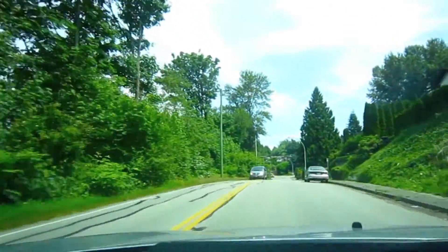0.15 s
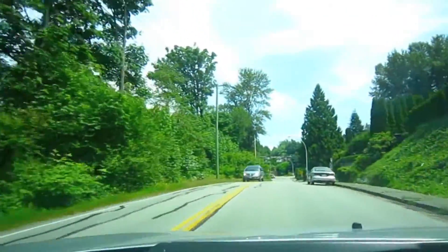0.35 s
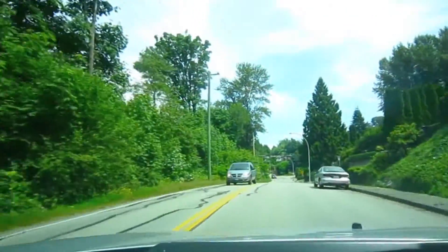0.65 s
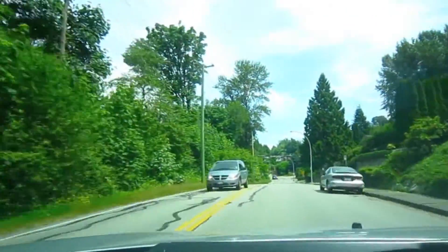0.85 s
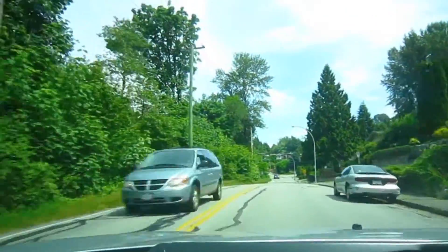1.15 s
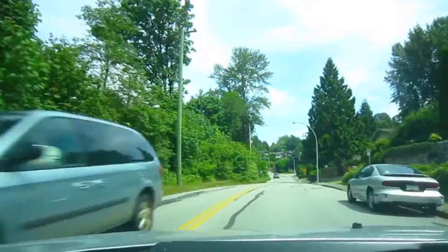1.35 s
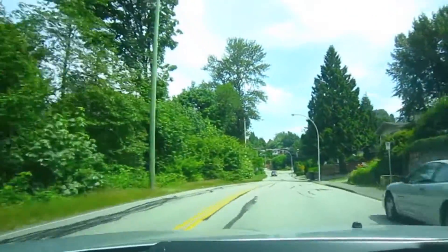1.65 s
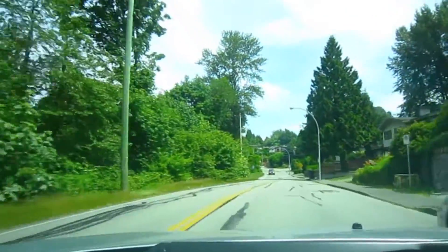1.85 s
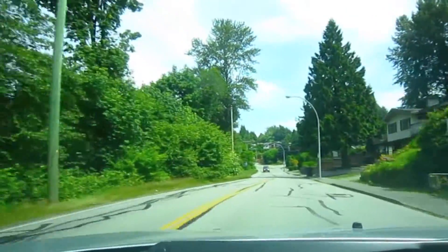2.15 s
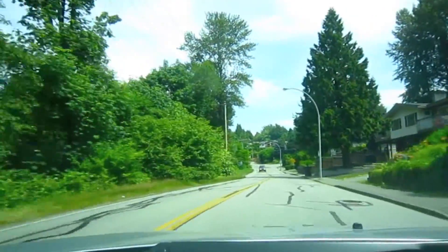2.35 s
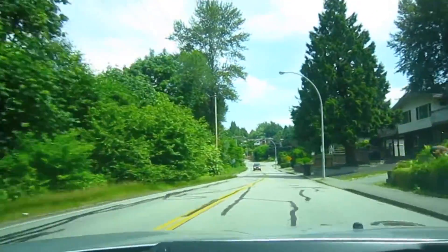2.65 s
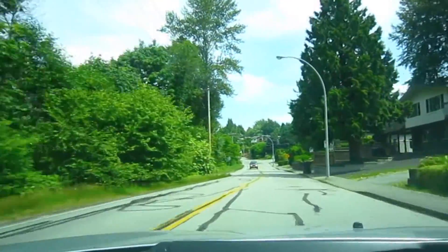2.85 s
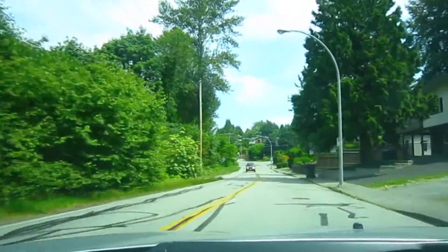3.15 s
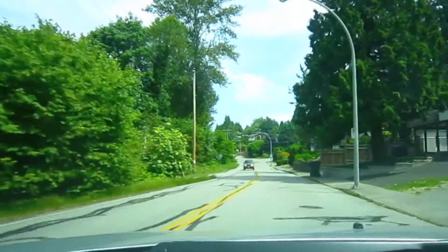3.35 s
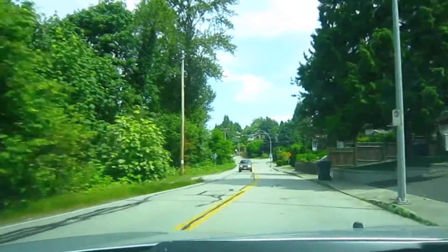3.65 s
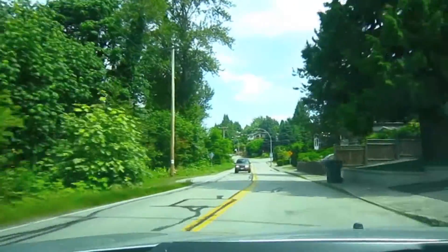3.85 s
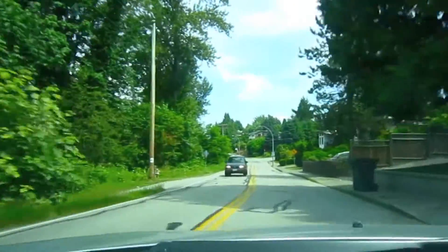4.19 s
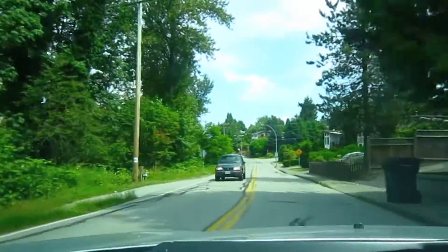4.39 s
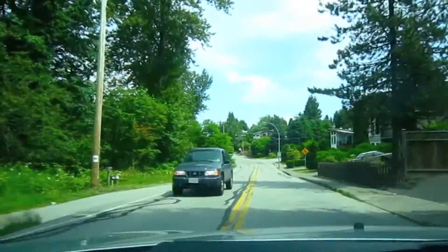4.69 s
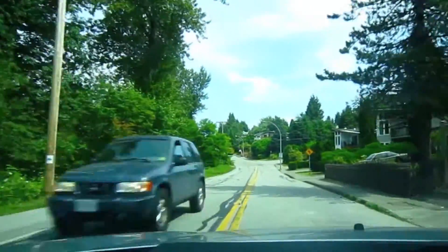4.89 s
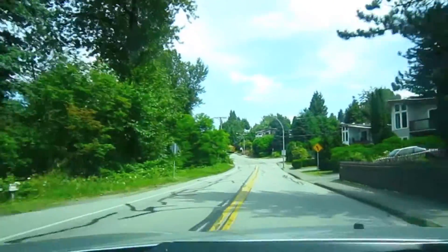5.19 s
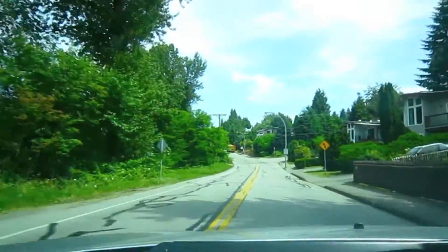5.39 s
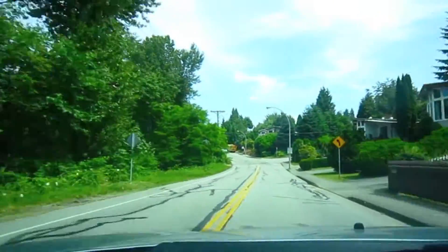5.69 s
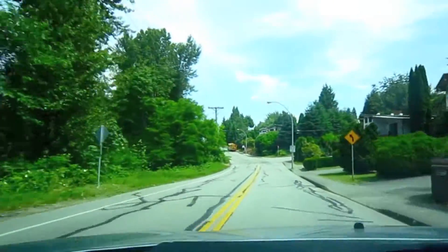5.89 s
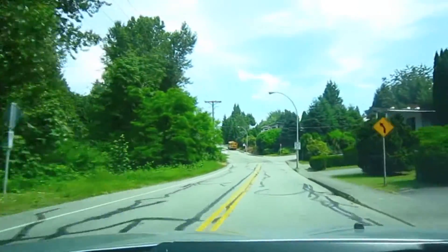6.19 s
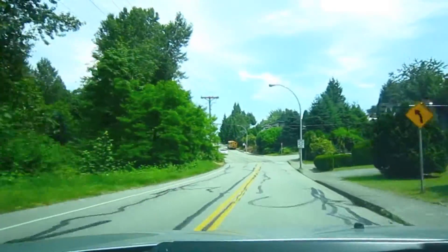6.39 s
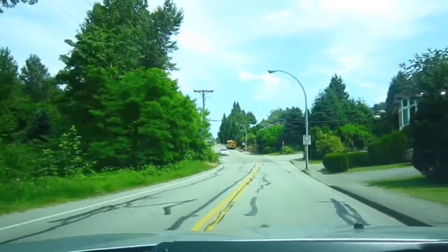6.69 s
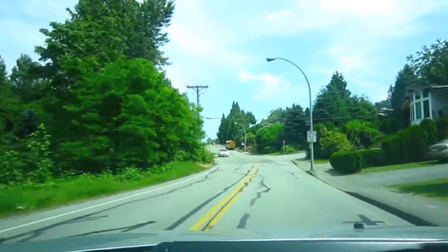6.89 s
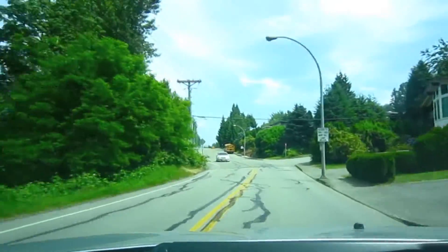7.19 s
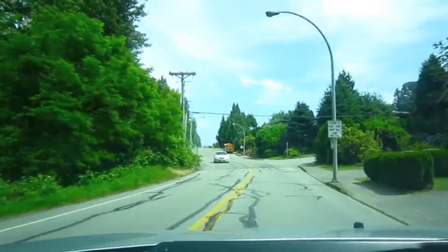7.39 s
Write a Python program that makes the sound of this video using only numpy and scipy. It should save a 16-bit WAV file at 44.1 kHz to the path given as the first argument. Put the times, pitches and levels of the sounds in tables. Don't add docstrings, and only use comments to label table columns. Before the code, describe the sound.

Heard from a small microphone inside a car: deep boom, floor drone, muffled tyre roar, soft air hiss and a faint gear whine. An oncoming car swishes by early. A dry dashboard tick follows, then a hard bump thumps the floor and rattles trim, coins and keys. The background dips briefly, recovers, and a fainter car passes.

```python
import sys
import numpy as np
from scipy import signal
from scipy.fft import rfft, irfft, next_fast_len
from scipy.io import wavfile
from scipy.ndimage import uniform_filter1d, map_coordinates

SR = 44100
rng = np.random.default_rng(int(sys.argv[2]) if len(sys.argv) > 2 else 0)


def transcribe(signal):
    frames = np.atleast_2d(signal).T
    limited = np.clip(frames, -1, 1)
    pcm = np.round(limited * 32767).astype(np.int16)
    wavfile.write(sys.argv[1], SR, pcm)


def how_loud(loudness_db):
    steps = np.asarray(loudness_db, float) / 20
    return 10 ** steps


N = 332514


def unit(x):
    return x / np.sqrt(np.mean(x ** 2) + 1e-20)


def curves(rows):
    times, *columns = np.transpose(rows)
    return [np.interp(np.arange(N) / SR, times, column) for column in columns]


def wobble(rate):
    knots = rng.standard_normal(int(N * rate / SR) + 4)
    return map_coordinates(knots, [np.arange(N) * rate / SR])


def noise(spectrum, modes=(), patchy_db=0.):
    z = signal.stft(rng.standard_normal(N + 512), nperseg=512)[2]
    patches = uniform_filter1d(rng.standard_normal(z.shape), 8, 0)
    patches = unit(uniform_filter1d(patches, 8, 1))
    x = signal.istft(z * how_loud(patchy_db * patches), nperseg=512)[1][:N]
    m = next_fast_len(N)
    hz = np.fft.rfftfreq(m, 1 / SR) + 1
    f, level = np.transpose(spectrum)
    db = np.interp(np.log(hz), np.log(f), level, left=-120)
    for centre, width, lift in modes:
        db += lift / (1 + (2 * (hz - centre) / width) ** 2)
    return unit(irfft(rfft(x, m) * how_loud(db), m)[:N])


def ring(modes, t, scatter_db, attack):
    total = np.zeros(len(t))
    for hz, db, t60 in modes:
        strength_db = db + rng.normal(0, scatter_db)
        total += how_loud(strength_db - 60 * t / t60) * np.sin(2 * np.pi * hz * t)
    return (1 - np.exp(-t / attack)) * total


def place(out, s, sound):
    out[round(s * SR):][:len(sound)] += sound


def crack(t):
    spike = np.exp(-((t - .0012) * SR) ** 2)
    puff = .07 * how_loud(-60 * t / .012) * rng.standard_normal(len(t))
    return spike + puff


# t/s, depth/dB, hold/s, recovery/s
GAIN_DUCKS = [
    (-.1, 3.5, 0.02, 0.53),
    (4.02, 7, 0.3, .3),
]


def gain_db():
    t = np.arange(N) / SR
    fall_s = .03
    total = np.zeros(N)
    for s, depth_db, hold, recovery in GAIN_DUCKS:
        drop = ((t - s) / fall_s).clip(0, 1)
        total -= depth_db * drop * np.exp(-(t - s - hold).clip(0) / recovery)
    return total


# t/s, unevenness/dB, coarseness/dB
ROAD_SURFACE = [(0, -1.5, -3), (.5, 0, -0.5), (1.1, 1, -0.5), (1.4, -0.5, 0.8), (2.0, 2, 0.6),
                (2.4, 1, -0.5), (2.9, 0, -1.5), (3.3, 1, -2), (3.6, 0, -1), (4.05, 0.5, -2), (4.2, 5, 0.5),
                (4.5, 0, -.5), (5.2, -1, 1), (5.6, 0, -0.4), (6.1, -0.5, 0.4), (6.5, 0.5, 0.4),
                (6.9, 2, -0.9), (7.54, -2.5, 0.5)]
# f/Hz, level/dB
BOOM_SPECTRUM = [(20, 0), (30, -2.5), (60, 2.5), (110, 0), (140, -4), (170, -27.5), (260, -68.5)]
# f/Hz, width/Hz, lift/dB
BODY_MODES = [(36.5, 16, 5), (100.4, 19.6, 7.5)]
# f/Hz, level/dB
DRONE_SPECTRUM = [(90, -39.5), (130, -17), (150, 1.5), (205, -5), (290, -3.5), (400, -11.5), (470, -18),
                  (510, -19.5), (540, -39), (700, -71)]
# f/Hz, width/Hz, lift/dB
FLOOR_MODES = [(159.8, 7.2, 5), (216.6, 2.9, 5.5), (232.5, 7.1, 5.5), (282.4, 24, 2), (430.3, 31, 3.5)]
# f/Hz, level/dB
ROAR_SPECTRUM = [(350, -29), (520, -4), (700, -3.5), (950, 0.5), (1160, -13.5), (1450, -10), (1580, -16),
                 (2000, -22), (2600, -28.5), (4000, -51)]
# f/Hz, width/Hz, lift/dB
TYRE_MODES = [(605, 30, 4.5), (915, 35, 0.5), (1108, 28, 3), (1283, 80, 3.5), (1684, 55, 6.5)]
# f/Hz, level/dB
HISS_SPECTRUM = [(1200, -22), (2200, -1), (3000, -1), (4000, -4), (5500, -7.5), (6100, -7), (7000, -10),
                 (10000, -15), (13000, -27), (15000, -28), (15800, -29.5)]


def road():
    boom_db, drone_db, roar_db, hiss_db = -22, -24, -39.5, -62.5
    warming_db_per_s = 0.07
    uneven_db, coarse_db = curves(ROAD_SURFACE)
    floor_db = .15 * uneven_db + .4 * coarse_db + warming_db_per_s * (np.arange(N) - N / 2) / SR
    boom = how_loud(boom_db + uneven_db + .8 * wobble(4)) * noise(BOOM_SPECTRUM, BODY_MODES)
    drone = how_loud(drone_db + floor_db + 0.52 * wobble(5)) * noise(DRONE_SPECTRUM, FLOOR_MODES, patchy_db=-0.73)
    roar = how_loud(roar_db + coarse_db + 0.26 * wobble(6)) * noise(ROAR_SPECTRUM, TYRE_MODES, patchy_db=0.48)
    hiss = how_loud(hiss_db + 0.76 * coarse_db + .3 * wobble(12)) * noise(HISS_SPECTRUM, patchy_db=0.05)
    return boom + drone + roar + hiss


# t/s, f/Hz
WHINE_PITCH = [(0, 489), (2, 489), (2.7, 492.5), (3.1, 497), (3.7, 503), (4.6, 509), (5.8, 517), (6.5, 514),
               (7.54, 510)]
# t/s, level/dB
WHINE_LEVEL = [(0, -38), (1.5, -41), (2.1, -42.5), (2.8, -42), (3.8, -41), (4.6, -50.5), (5.8, -48),
               (6.4, -53), (7.54, -44)]
# share of the whine's f, level/dB
ENGINE_ORDERS = [(0.124, -28.5), (0.178, -29.5), (0.252, -33.5)]


def drivetrain():
    load_db = curves(ROAD_SURFACE)[0]
    turns = 2 * np.pi * np.cumsum(curves(WHINE_PITCH)[0]) / SR
    whine_db = curves(WHINE_LEVEL)[0] + 2.4 * wobble(4)
    total = how_loud(whine_db) * np.sin(turns + 0.54 * wobble(6.5))
    for share, db in ENGINE_ORDERS:
        hum_db = db + load_db + 3.6 * wobble(2.55)
        total += how_loud(hum_db) * np.sin(share * turns + 0.27 * wobble(3.13))
    return total


def camera_whistle():
    return how_loud(-95.5) * np.sin(2 * np.pi * 15688 * np.arange(N) / SR)


# closest t/s, level/dB, passing time/s
ONCOMING_CARS = [
    (1.5, -56.5, 0.34),
    (5.1, -66.5, .25),
]
# f/Hz, level/dB
ONCOMING_TYRES = [(900, -14.5), (1500, -7), (1800, 3.5), (2300, -8.5), (4000, -14.5), (8000, -27)]


def oncoming():
    t = np.arange(N) / SR
    swell = sum(how_loud(db) / np.sqrt(1 + ((t - s) / passing) ** 4) for s, db, passing in ONCOMING_CARS)
    return swell * noise(ONCOMING_TYRES, patchy_db=0.5)


# t/s, peak level/dB
DASHBOARD_TICKS = [
    (2.9209, -46.5),
    (4.972, -60),
]


def dashboard_ticks():
    t = np.arange(N) / SR
    decay = sum(how_loud(db - 2 - 60 * (t - s).clip(0) / .018) * (t >= s) for s, db in DASHBOARD_TICKS)
    return decay * noise([(4500, -32), (7000, -1), (15500, 0.0)])


# t/s, level/dB
TRAY_KNOCKS = [(3.891, -32), (4.005, -33), (4.0154, -27), (4.0305, -27), (4.0418, -25), (4.052, -29),
               (4.0664, -24.5), (4.1347, -32.5), (4.15, -41), (4.2005, -26), (4.2045, -26.5), (4.2714, -31),
               (4.2941, -38)]
# f/Hz, level/dB, T60/s
TRAY_MODES = [(953, 1, 0.031), (1220, -1.5, 0.024), (1420, -3, 0.027), (1760, -6, 0.024),
              (2340, -10, 0.027), (2650, -9.5, 0.017)]


def tray_knocks():
    out, t = np.zeros(N), np.arange(SR // 10) / SR
    for s, db in TRAY_KNOCKS:
        place(out, s, how_loud(db - 6) * ring(TRAY_MODES, t, scatter_db=1.5, attack=0.00061))
    return out


# t/s, level/dB
TRIM_SCUFFS = [(3.891, -52), (3.9705, -47), (3.9952, -53), (4.0018, -44), (4.006, -44), (4.0154, -34.5),
               (4.031, -44), (4.0418, -44), (4.056, -44), (4.0664, -42), (4.075, -47), (4.15, -52),
               (4.179, -46), (4.2015, -45), (4.2714, -51)]
# t/s, level/dB
TRIM_SNAPS = [(4.005, -44), (4.0515, -31), (4.062, -42), (4.0943, -32.5), (4.114, -26), (4.1343, -27.5),
              (4.2937, -29.5)]
# f/Hz, level/dB, T60/s
TRIM_MODES = [(2340, 1.5, .015), (2700, -1, .011), (3340, 2.5, .014), (4290, 2.5, .012), (4600, -4, .009),
              (5180, -8, .011), (11800, -20, .006)]
# f/Hz, level/dB
SCRAPE_SPECTRUM = [(1000, -2), (2000, 2), (4500, -8.5), (6000, -17), (15000, -32)]


def trim():
    out, t = np.zeros(N), np.arange(SR // 10) / SR
    dull = noise(SCRAPE_SPECTRUM)
    for contacts, ringing, scraping in ((TRIM_SCUFFS, .5, 1.3), (TRIM_SNAPS, 1, .4)):
        for s, db in contacts:
            tick = ring(TRIM_MODES, t, scatter_db=1.2, attack=0.0007)
            tick = tick + .65 * np.pad(tick, (44, 0))[:len(t)]
            scrape = how_loud(-60 * t / .024) * dull[round(s * SR):][:len(t)]
            body = np.roll(ringing * tick + scraping * scrape, shift=36)
            place(out, s, how_loud(db - 8.5) * body + how_loud(db - 24) * crack(t))
    return out


# middle t/s, peak level/dB, ring f/Hz, length/s
FLOOR_BLOWS = [
    (3.9578, -7.5, 200, .0035),
    (3.9630, -6, 150, .0025),
    (3.9712, -.5, 115, .0034),
    (4.0027, -3.5, 135, .0044),
    (4.054, -14, 110, .006),
    (3.9703, -21, 600, .0007),
]
# middle t/s, peak level/dB, ring f/Hz, length/s
SPRING_REBOUNDS = [
    (4.175, -15.5, 40, 0.021),
    (4.258, -16.5, 60, 0.01),
]


def bump():
    t = np.arange(N) / SR
    directions = (1, 1, -1, 1, 1, -1, 1, 1)
    out = np.zeros(N)
    for (s, db, hz, length), way in zip(FLOOR_BLOWS + SPRING_REBOUNDS, directions):
        envelope = np.exp(-((t - s) / length) ** 2 / 2)
        out += way * how_loud(db) * envelope * np.cos(2 * np.pi * hz * (t - s))
    return out


# t/s, level/dB
COIN_JUMPS = [(3.9699, -62), (4.005, -64), (4.052, -63), (4.062, -51), (4.1084, -56), (4.15, -68),
              (4.2248, -63), (4.2572, -70), (4.3288, -65)]
# f/Hz, level/dB, T60/s
COIN_MODES = [(10500, 7, .022), (13200, -20, .01)]
# t/s, level/dB
KEY_JUMPS = [(3.9699, -62), (3.9945, -61), (4.0023, -61), (4.005, -59), (4.0154, -57), (4.029, -57),
             (4.0418, -66), (4.052, -59), (4.062, -56), (4.0664, -61), (4.202, -66)]
# f/Hz, level/dB, T60/s
KEY_MODES = [(7650, 6, 0.02), (6500, -6, .012), (8510, -10, .015)]


def coins_and_keys():
    out, t = np.zeros(N), np.arange(SR // 10) / SR
    for jumps, modes, lift_db, scatter_db in ((COIN_JUMPS, COIN_MODES, 0, 0), (KEY_JUMPS, KEY_MODES, -1.5, 4)):
        for s, db in jumps:
            place(out, s, how_loud(db + lift_db) * ring(modes, t, scatter_db, attack=0.00061))
    return out


# t/s, level/dB
EDGE_CRACKS = [(3.9700, -36), (3.9754, -64), (4.0014, -39), (4.005, -58), (4.0154, -46.5), (4.0305, -57),
               (4.0418, -58), (4.062, -55), (4.0664, -58), (4.1084, -60), (4.1143, -47), (4.135, -51),
               (4.15, -62), (4.1592, -55), (4.1926, -62), (4.202, -62), (4.2248, -60), (4.2572, -62),
               (4.3288, -59)]


def edge_cracks():
    out, t = np.zeros(N), np.arange(SR // 10) / SR
    for s, db in EDGE_CRACKS:
        place(out, s, how_loud(db + 15) * crack(t))
    return out


# f/Hz, level/dB
JIGGLE_SPECTRUM = [(1000, -2), (2000, 8), (4500, -10), (7000, -13), (11000, -23), (15000, -28)]


def jiggle():
    start, db, t60, lumpy_db = 4.0, -51.5, 0.5, 6.5
    since = np.arange(N) / SR - start
    level_db = db - 60 * since.clip(0) / t60 + lumpy_db * wobble(130)
    return (since > 0) * how_loud(level_db) * noise(JIGGLE_SPECTRUM)


def mount_rub():
    start, end, first_db, growth_db = 4.62, 4.8, -75.5, 11
    t = np.arange(N) / SR
    progress = ((t - start) / (end - start)).clip(0, 1)
    push = how_loud(first_db + growth_db * np.sin(1.9 * progress)) * (t > start) * (t < end)
    friction = noise([(5000, -20), (9000, 0), (15500, -1)], patchy_db=1.5)
    return uniform_filter1d(push, size=600) * friction


def scene():
    steady = how_loud(gain_db()) * (road() + drivetrain())
    loose = tray_knocks() + trim() + coins_and_keys() + edge_cracks() + jiggle()
    small = camera_whistle() + dashboard_ticks() + mount_rub()
    return (steady + oncoming() + bump() + loose + small)[None]


def low_pass(x):
    return signal.sosfilt(signal.butter(12, 15870, fs=SR, output="sos"), x)


def record(dry):
    ceiling, sag_from_hz, top_hz, sag_db = .7, 15000, 15820, -6
    x = dry / (1 + np.abs(dry / ceiling) ** 24) ** (1 / 24)
    m = next_fast_len(N)
    hz = np.fft.rfftfreq(m, 1 / SR)
    sag = how_loud(np.interp(hz, [sag_from_hz, top_hz], [0, sag_db])) * (hz < top_hz)
    mix = irfft(rfft(x, m) * sag, m)[:, :N]
    return low_pass(mix)


dry = scene()
out = record(dry)
transcribe(out)
```